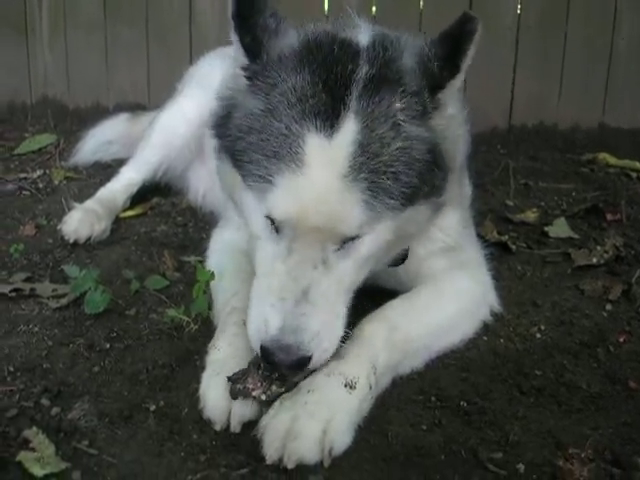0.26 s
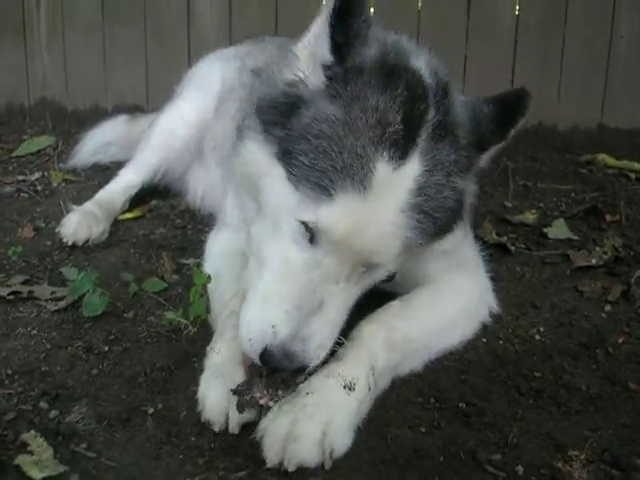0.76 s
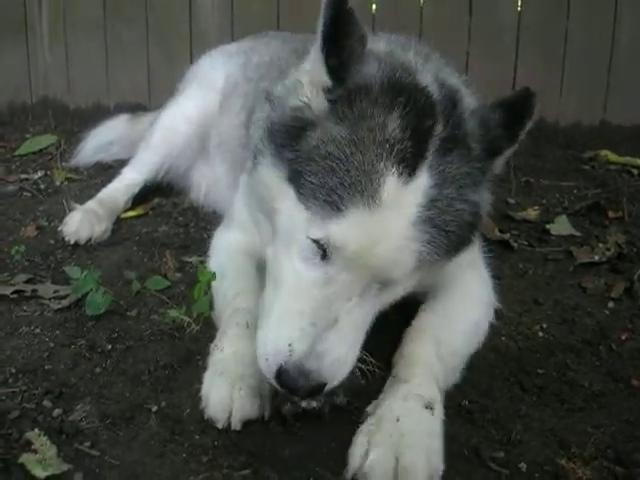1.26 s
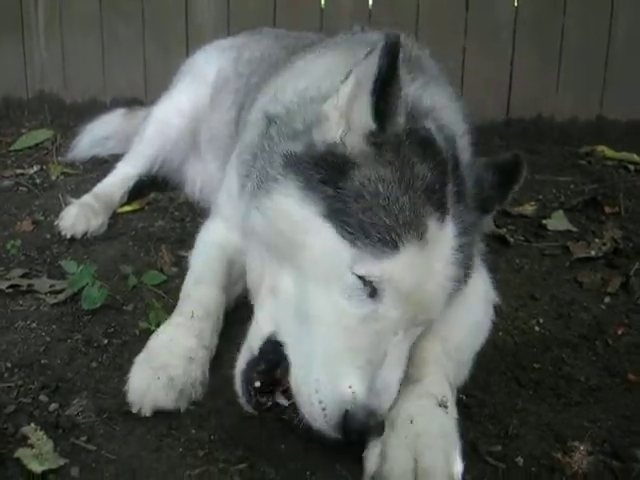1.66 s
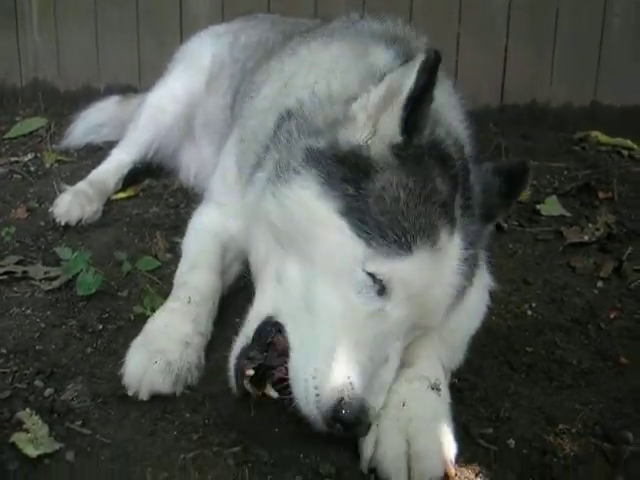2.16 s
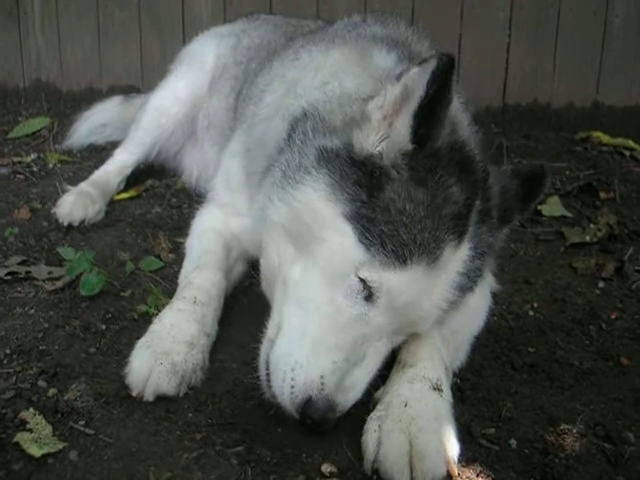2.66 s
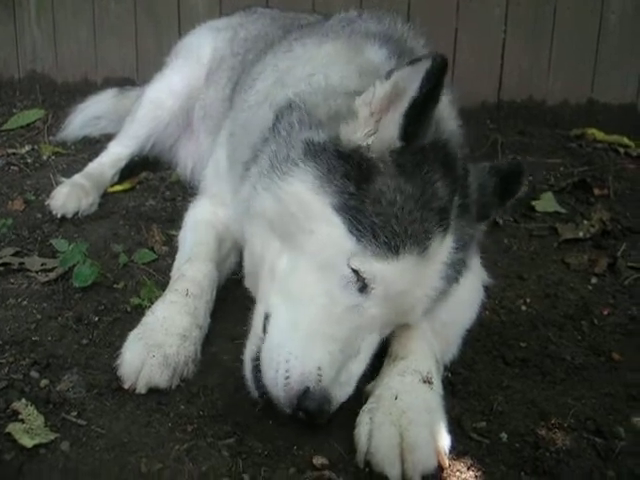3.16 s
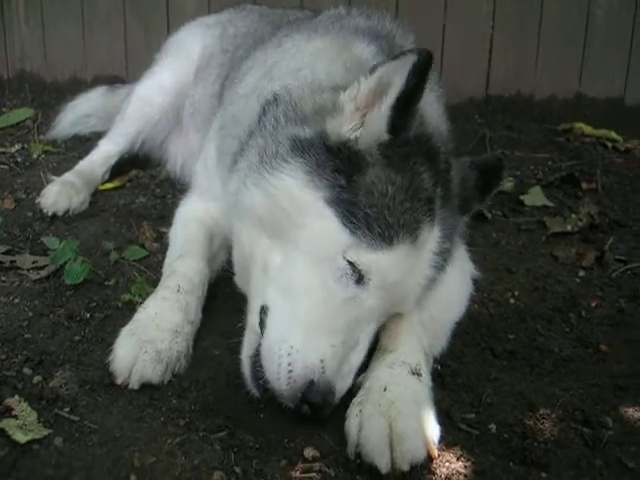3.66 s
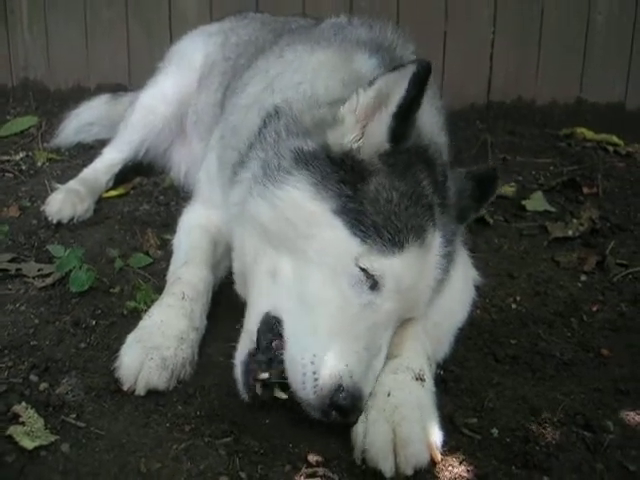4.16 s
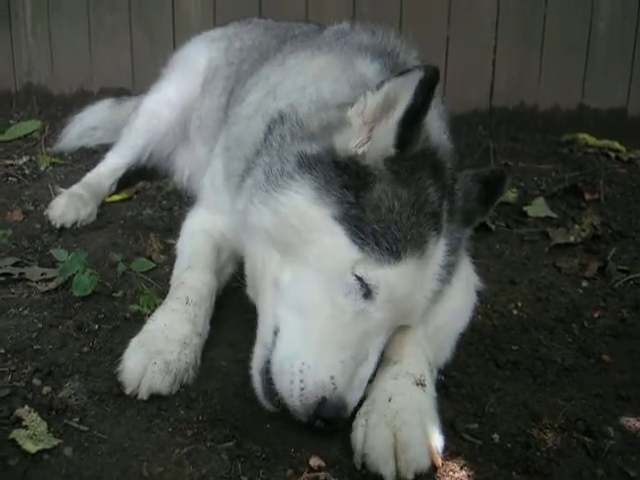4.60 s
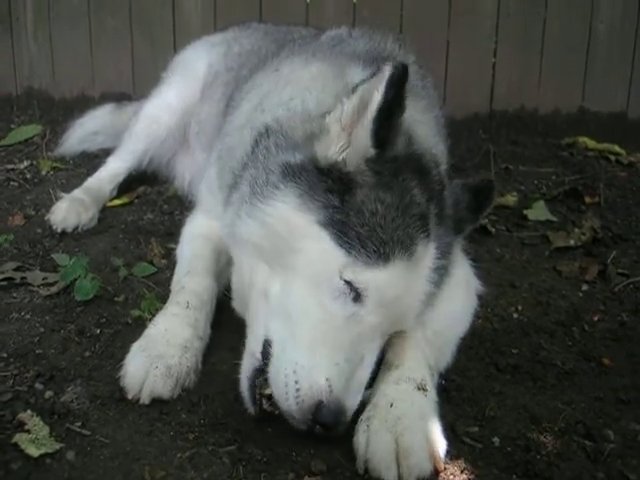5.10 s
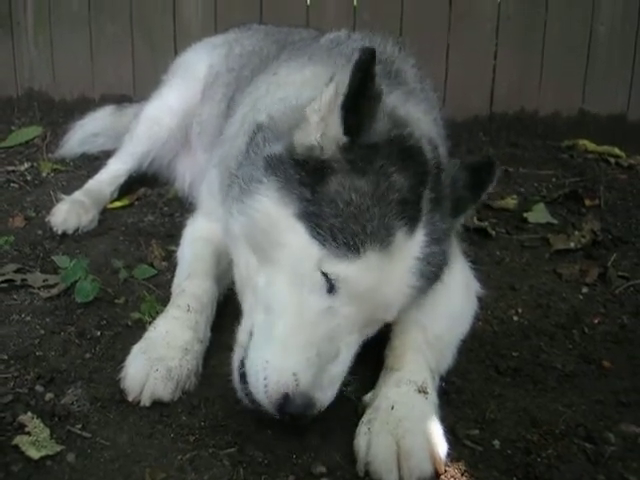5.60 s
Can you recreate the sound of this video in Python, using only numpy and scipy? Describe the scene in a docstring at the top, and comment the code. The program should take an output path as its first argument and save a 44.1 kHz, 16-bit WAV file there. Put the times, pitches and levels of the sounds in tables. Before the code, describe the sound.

Close, wet chewing and crackling as a dog's teeth knock on a bone and crack it, over soft outdoor hiss.

```python
"""A dog gnaws a bone in a yard before a wooden fence, close to a small microphone.
The microphone and open air hiss from the start. Then teeth knock on the bone and ring the half-open
mouth, and each stroke of the jaw grinds and crackles wetly. The bone first cracks at 1.3 seconds, and
splinters snap off as the chewing goes on. At 4.6 and 5.5 seconds it cracks much harder and jolts
the dog's head; the loudest peaks overload the microphone."""
import sys
import numpy as np
from scipy import signal
from scipy.fft import rfft, irfft
from scipy.io import wavfile

SR = 44100
rng = np.random.default_rng(int(sys.argv[2]) if len(sys.argv) > 2 else 0)


def master_out(mix):
    """Clip the mix to full scale and print it as 16-bit PCM to the path in sys.argv[1]."""
    frames = np.transpose(np.atleast_2d(mix))
    ceiling = np.clip(frames, -1, 1)
    pcm = np.round(ceiling * 32767).astype(np.int16)
    wavfile.write(sys.argv[1], SR, pcm)


N = 257544

# Brittle notes of bone and teeth. Each row: pitch in Hz, relative level in dB, fade time in seconds.
BRITTLE_NOTES = [(1430, 3.5, 0.0053), (1554, -0.5, 0.011), (1787, 5, 0.011), (2008, 1.5, 0.014),
                 (2340, 2, 0.014), (2745, -1, 0.013), (2940, -7.5, 0.023), (3270, -5, 0.012),
                 (3680, -8.5, 0.0055)]


def amp(db):
    """Turns decibels into a number to multiply a sound by."""
    return 10 ** (np.asarray(db) / 20)


def unit(x):
    """Scales a sound to an average power of 1."""
    return x / np.sqrt(np.mean(x ** 2) + 1e-20)


def add(mix, start, sound):
    """Mixes a sound in at a start time in seconds."""
    part = mix[max(round(start * SR), 0):][:len(sound)]
    part += sound[:len(part)]


def ring(notes, rise, size=3000):
    """A tap of about rise seconds rings notes that each drop 60 dB in their fade time; the peak is 1."""
    t = np.arange(size) / SR
    wave = sum(amp(db - 60 * t / max(fade, .002)) * np.sin(2 * np.pi * hz * t) for hz, db, fade in notes)
    wave = wave * (1 - np.exp(-t / rise))
    return wave / abs(wave).max()


def hiss(level_db=-41.5):
    """The open air and the microphone make a steady noise."""
    # The tone of the hiss. Each row: frequency in Hz, relative level in dB.
    hiss_shape = [(20, -22), (45, -17), (80, -6.5), (130, -4.5), (200, -1), (350, 0), (550, -0.5),
                  (800, -4), (1200, -8), (1800, -11.5), (2600, -13.5), (3400, -15.5), (4200, -27)]
    hz, db = np.transpose(hiss_shape)
    colour = amp(np.interp(np.log(np.fft.rfftfreq(N, 1 / SR) + 1), np.log(hz), db))
    return amp(level_db) * unit(irfft(rfft(rng.standard_normal(N)) * colour, N))


def blow(thud_db, snap_db, snap_hz):
    """A tooth knocks the bone, thuds through the jaw and snaps off a splinter."""
    # Notes of the held bone. Each row: pitch in Hz, relative level in dB, fade time in seconds.
    bone_notes = [(759, -9, 0.029), (838, -3, 0.08), (994, 1, 0.022), (1460, -7.5, 0.011)]
    # Dull notes of jaw and cheeks, with the same columns.
    jaw_notes = [(206, -17, .026), (392, 2, 0.035), (494, 4.5, 0.1)]
    knock, thud = ring(bone_notes, rise=0.00036), ring(jaw_notes, rise=0.00078)
    return knock + amp(thud_db) * thud + amp(snap_db) * snap(snap_hz)


def snap(centre_hz, width_octaves=0.29):
    """A splinter breaks; its size picks which brittle notes sound."""
    picked = [(hz, db - 10 * (np.log2(hz / centre_hz) / width_octaves) ** 2 / np.log(10), fade)
              for hz, db, fade in BRITTLE_NOTES]
    return ring(picked, rise=0.00025)


def bites(mouth_fade_s=0.031):
    """Single blows of the teeth ring the mouth; splinters snap between them."""
    # Blows of tooth on bone. Each row: start in seconds, knock level in dB, mouth pitch in Hz,
    # thud and snap levels in dB compared with the knock, snap pitch in Hz.
    tooth_blows = [(0.4917, -29.5, 757, -17, -3, 2280), (1.0481, -24, 944, -10, -14, 1750),
                   (1.0585, -18, 1000, -3.5, -8.5, 2500), (1.0664, -21, 917, -18.5, -22, 1430),
                   (1.1383, -28, 880, -6.5, -10, 1610), (1.157, -25, 1010, -2, -15, 1400),
                   (1.2544, -28, 830, -4, -13, 1400), (1.7623, -25, 790, -16, -18, 1515),
                   (1.7772, -21, 965, 2.5, -2.5, 1600), (1.7828, -28, 1214, -6, 2, 2570),
                   (1.919, -26, 742, -20, -5, 1400), (1.9563, -29, 1100, -3, -10, 1530),
                   (1.9662, -29.5, 987, -7, -9, 2850), (2.2467, -24, 1130, -20, -7.5, 2570),
                   (2.2611, -26.5, 760, -8, -4, 3510), (2.3823, -24, 843, -0.5, -16, 3500),
                   (2.3957, -26.5, 714, -6, -10, 1400), (2.432, -26.5, 1040, -8, 11, 1510),
                   (2.5803, -27.5, 835, -10, -6, 4100), (3.0349, -31, 950, -17, -2, 1400),
                   (3.0655, -34, 1020, 2, -8, 1750), (3.2591, -20.5, 768, -7, 1, 1660),
                   (3.3611, -31.5, 860, -18, 7.5, 2420), (3.6288, -35.5, 970, -18, 4, 2200),
                   (4.234, -33, 770, -9, 0.5, 1410), (4.6446, -21, 1135, -5.5, -20, 2010),
                   (4.8313, -32, 683, 0.5, -21, 3000), (4.9733, -20, 930, -9, -16, 1680),
                   (5.3042, -22, 1000, -15, 4.5, 2260), (5.3198, -22.5, 1204, -21, 3, 2560),
                   (5.8048, -28, 1050, -27, 9.5, 1410)]
    # Splinters breaking on their own. Each row: start in seconds, level in dB, pitch in Hz.
    splinters = [(2.4834, -29, 1400), (2.492, -26.5, 1700), (2.591, -32, 4100), (2.608, -32, 2900),
                 (2.962, -24.5, 2000), (2.9695, -20.5, 4100), (3.364, -30.5, 4100), (3.38, -33, 2450),
                 (3.401, -25.5, 2600), (4.6637, -26, 1400), (5.4229, -31, 2000), (5.63, -28.5, 3200),
                 (5.671, -27, 1400)]
    out = np.zeros(N)
    for start, db, mouth_hz, thud_db, snap_db, snap_hz in tooth_blows:
        mouth = ring([(mouth_hz, 0, mouth_fade_s)], rise=0.00052)
        add(out, start, amp(db) * (blow(thud_db, snap_db, snap_hz) + mouth))
    for start, db, hz in splinters:
        add(out, start, amp(db) * snap(hz))
    return out


def chewing_swells(edge_db=-21.5, roundness=1.45):
    """Grinding and crackle swell and fade. Gives the strength of each, and the mouth's pitch."""
    # Jaw strokes, and a short spray of crumbs after the crack at 4.6 seconds. Each row: peak time,
    # rise and fall in seconds, grinding and crackle levels in dB, mouth pitch in Hz.
    swells = [(0.879, 0.17, .13, -46, -58, 900), (1.085, 0.041, 0.064, -36, -50, 960),
              (1.195, 0.048, 0.12, -36, -51.5, 973), (1.49, 0.36, 0.17, -43, -49, 1020),
              (1.80, 0.079, 0.1, -37.5, -50, 930), (2.072, 0.078, 0.062, -27, -48, 871),
              (2.29, 0.11, 0.35, -37.5, -43.5, 1035), (2.40, 0.093, 0.32, -39.5, -50, 780),
              (2.619, 0.17, 0.3, -37.5, -49.5, 860), (3.385, 0.13, 0.067, -35, -54, 1000),
              (3.70, .1, .11, -40.5, -47.5, 890), (3.93, 0.1, 0.24, -35, -47.5, 750),
              (4.309, .06, .09, -40.5, -43.5, 920), (4.429, 0.085, 0.059, -33.5, -51, 860),
              (4.574, .008, 0.033, -28.5, -35.5, 950), (4.668, 0.097, 0.11, -39, -44, 1040),
              (4.95, 0.061, .05, -44.5, -45, 1034), (5.058, .13, 0.05, -32, -51, 810),
              (5.165, 0.18, 0.083, -31.5, -50.5, 810), (5.50, 0.36, 0.23, -38.5, -41, 1108)]
    t = np.arange(N) / SR
    grind, crackle = np.full(N, amp(-61)), np.full(N, amp(-59.5))  # tongue and lips between swells
    for peak, rise, fall, grind_db, crackle_db, _ in swells:
        from_peak = np.maximum((peak - t) / rise, (t - peak) / fall)
        swell = amp(edge_db * from_peak ** roundness)
        grind = np.maximum(grind, amp(grind_db) * swell)
        crackle = np.maximum(crackle, amp(crackle_db) * swell)
    times, *_, mouth_hz = np.transpose(swells)
    return grind, crackle, np.interp(t, times, mouth_hz)


def resonate(x, hz, width_hz=170):
    """A hollow space picks out the sound near its changing pitch."""
    turn = np.exp(2j * np.pi * np.cumsum(hz) / SR)
    decay = np.exp(-np.pi * width_hz / SR)
    return 2 * (turn * signal.lfilter([1 - decay], [1, -decay], x / turn)).real


def slips(per_s, spread_db):
    """Tiny slips click at random; with more spread, a few stand out above the rest."""
    size = amp(spread_db * np.minimum(rng.exponential(1, N), 3.5))
    return size * rng.choice([-1, 1], N) * (rng.random(N) < per_s / SR)


def gnawing(body_db=-6, hollow_db=-2, wet_damping=0.33):
    """Teeth catch and slip, ringing the mouth as the jaw moves; saliva and crumbs crackle on top."""
    # Notes of the hollow mouth. Each row: pitch in Hz, relative level in dB, fade time in seconds.
    mouth_notes = [(463, -13, 0.022), (717, -4, 0.058), (800, -6.5, 0.025), (1052, 0, 0.023),
                   (1500, -14.5, 0.022)]
    grind_gain, crackle_gain, mouth_hz = chewing_swells()
    mouth = ring(mouth_notes, rise=0.00032)
    body = unit(signal.oaconvolve(slips(per_s=1100, spread_db=0), mouth)[:N])
    rub = slips(per_s=6500, spread_db=1.9)
    hollow = unit(resonate(resonate(rub, mouth_hz), mouth_hz))
    # each crumb ticks one brittle note, cut short by the wet mouth
    ticks = [amp(db) * ring([(hz, 0, wet_damping * fade)], rise=.0001) for hz, db, fade in BRITTLE_NOTES]
    crackle = unit(sum(signal.oaconvolve(slips(per_s=190, spread_db=4.5), tick)[:N] for tick in ticks))
    return grind_gain * (amp(body_db) * body + amp(hollow_db) * hollow) + crackle_gain * crackle


def cracks(mouth_rise_s=0.0014, mouth_fade_s=0.015):
    """The bone gives a little, splits, and the teeth meet behind it; hard breaks jolt the head."""
    # Breaks of the bone. Each row: start in seconds, knock level in dB, mouth and snap pitches in Hz,
    # then in dB compared with the knock: mouth ring, thud, snap, shaft split, first give, teeth meeting.
    breaks = [(1.3086, -18.5, 794, 2060, 11, -18, -4, -30, -7, 2.5),
              (4.5636, -7.5, 752, 1906, -3.5, -8, 3.5, -19.5, -5.5, -30),
              (5.5109, -4.5, 1074, 3200, 5, -5, 2.5, 5, -19, -7)]
    # Jolts of the head. Each row: start in seconds, level in dB, pitch in Hz, fade time in seconds.
    jolts = [(4.56, -17.5, 202, 0.056), (5.512, -17.5, 135, 0.02)]
    out = np.zeros(N)
    closed_mouth = amp(-5) * ring([(1020, 0, mouth_fade_s)], mouth_rise_s)
    shaft = ring([(1419, 0, 0.013)], rise=0.00017)
    for start, db, mouth_hz, snap_hz, ring_db, thud_db, snap_db, split_db, give_db, meet_db in breaks:
        side_knock = blow(thud_db, snap_db, snap_hz=1850)
        mouth = amp(ring_db) * ring([(mouth_hz, 0, mouth_fade_s)], mouth_rise_s)
        add(out, start - .0031, amp(db + give_db) * side_knock)
        add(out, start, amp(db) * (blow(thud_db, snap_db, snap_hz) + mouth + amp(split_db) * shaft))
        add(out, start + .005, amp(db + meet_db) * (side_knock + closed_mouth))
    for start, db, hz, fade in jolts:
        add(out, start, amp(db) * ring([(hz, 0, fade)], rise=0.0017))
    return out


def yard(x, fade_s=0.21, tail_db=-23, size=16000):
    """The yard adds a few close echoes and a faint, short tail of scattered sound."""
    # Echoes from ground and fence. Each row: delay in seconds, strength as a share of the direct sound.
    echoes = [(.003, 0.24), (.0063, 0.092), (0.0133, .095), (0.021, 0.039)]
    t = np.arange(size) / SR
    scatter = rng.standard_normal(size) * amp(-60 * t / fade_s) * (t > .008)
    response = amp(tail_db) * scatter / np.linalg.norm(scatter)
    response[0] = 1  # the direct sound
    for delay, gain in echoes:
        add(response, delay, np.array([gain]))
    return signal.oaconvolve(x, response)[:N]


def scene(bass_cut_hz=87):
    """The dog chews in the yard, over the hiss; the microphone picks up almost none of its deep bass."""
    bass_cut = signal.butter(2, bass_cut_hz, "highpass", fs=SR, output="sos")
    dog = signal.sosfilt(bass_cut, bites() + cracks() + gnawing())
    return (yard(dog) + hiss())[None]


def low_pass(x, hz):
    """Steeply cuts away the sound above hz."""
    return signal.oaconvolve(x, signal.firwin(255, hz, window=("kaiser", 9), fs=SR)[None], "same")


def record(dry):
    """The microphone loses the treble; its wave sits off centre and the loudest peaks are cut flat."""
    offset, full_scale = -.055, .714
    muffled = low_pass(dry, hz=4126)
    clipped = np.clip(muffled, -full_scale - offset, full_scale - offset)
    return low_pass(clipped, hz=16000) + offset


dry = scene()
out = record(dry)
master_out(out)
```